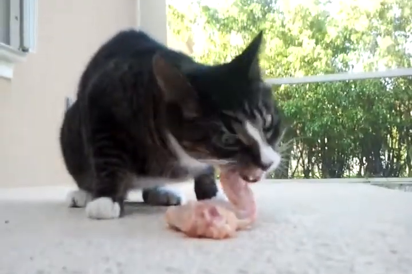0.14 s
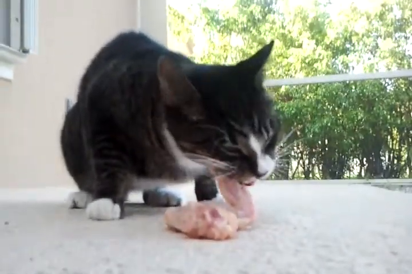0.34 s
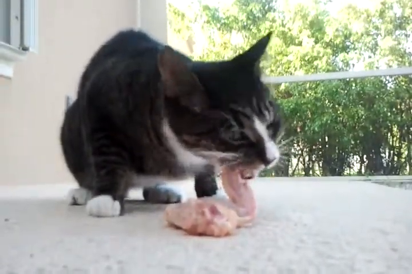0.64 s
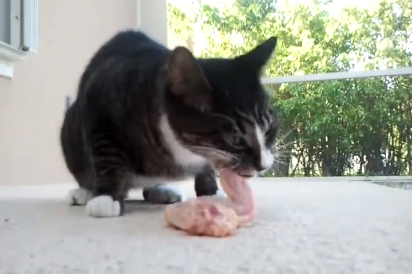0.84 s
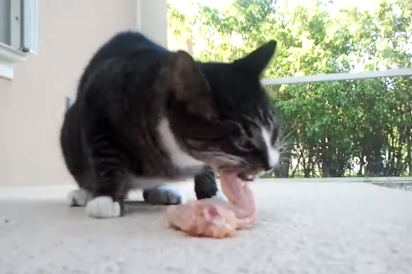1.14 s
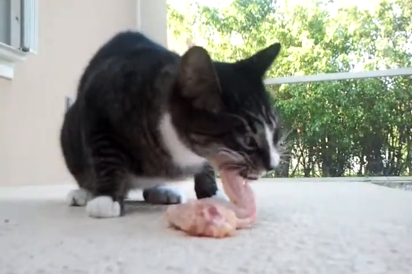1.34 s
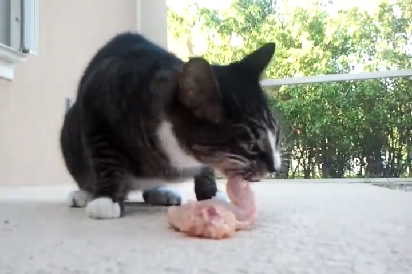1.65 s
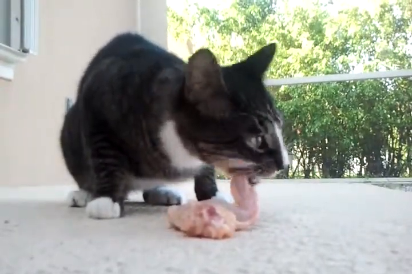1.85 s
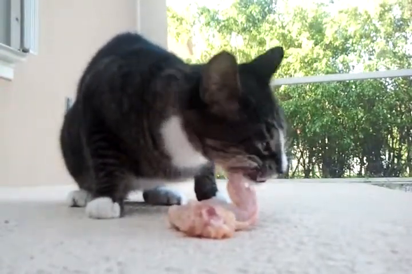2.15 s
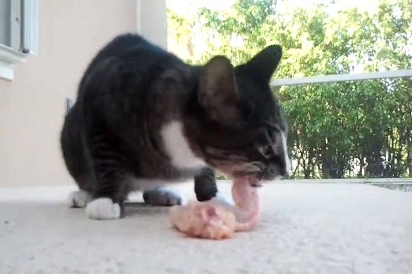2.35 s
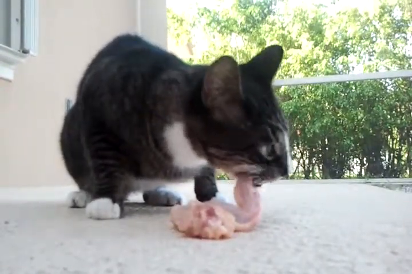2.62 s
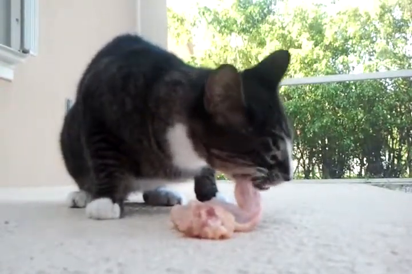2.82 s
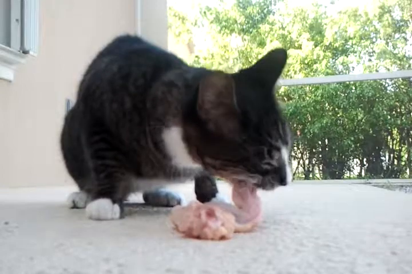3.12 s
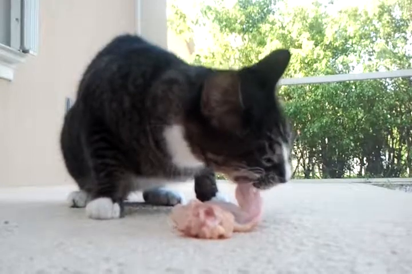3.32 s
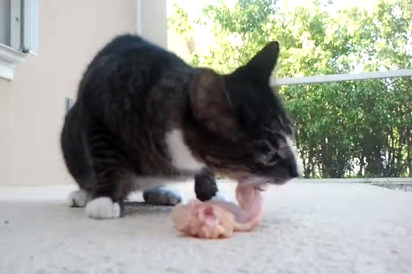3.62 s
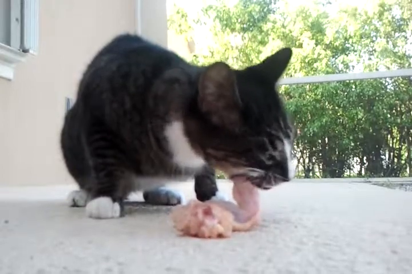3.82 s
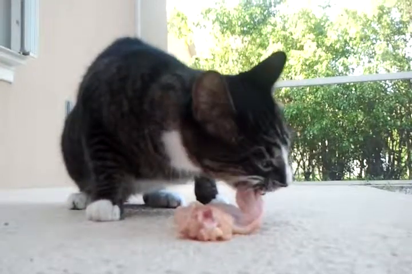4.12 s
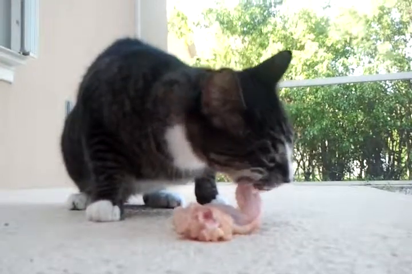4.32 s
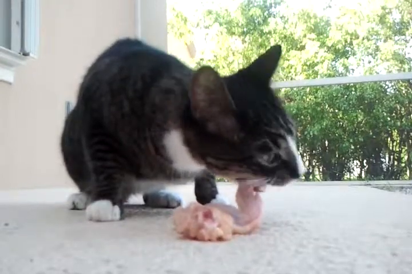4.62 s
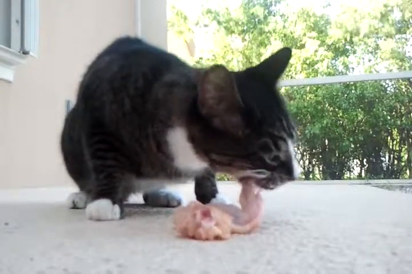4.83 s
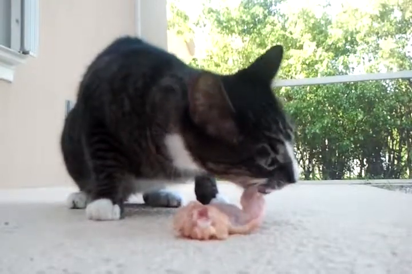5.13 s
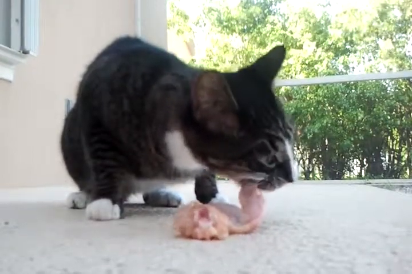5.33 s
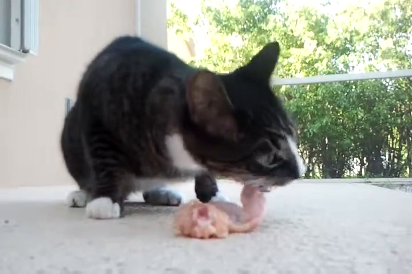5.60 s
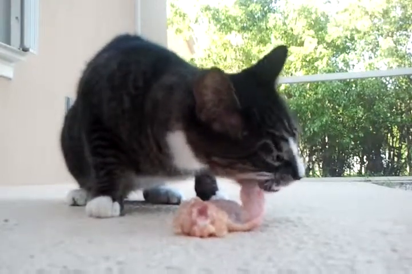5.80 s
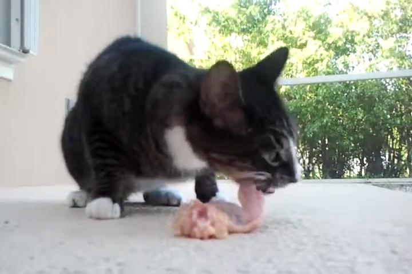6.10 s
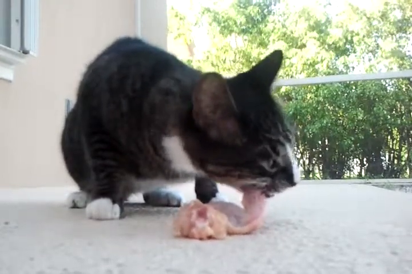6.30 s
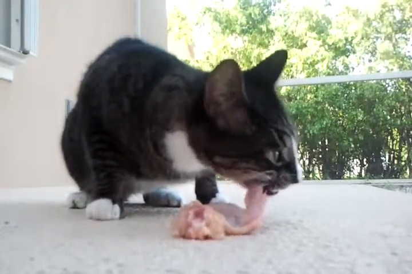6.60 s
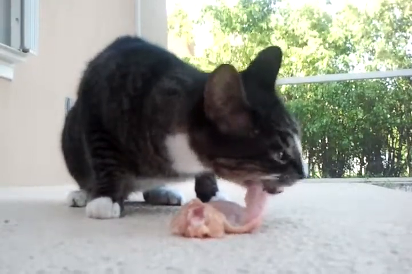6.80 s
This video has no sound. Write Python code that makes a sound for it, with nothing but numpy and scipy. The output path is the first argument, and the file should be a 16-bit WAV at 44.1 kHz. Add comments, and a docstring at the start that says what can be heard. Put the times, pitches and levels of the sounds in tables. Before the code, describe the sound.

A cat gnaws a raw chicken wing on a porch, close to a small camera microphone. After a moment of faint outdoor hiss, bone and gristle crack in irregular clusters of short, bright snaps, mixed with tooth grinding and fine crackle. Wet smacks come more often toward the end, where the loudest cracks land with slight dull thumps. Far traffic, a faint hum and a distant engine lie underneath.

```python
"""A cat gnaws a raw chicken wing on a porch floor, close to a small camera microphone.
Bone and gristle crack in short ringing snaps, teeth grind in runs of slips, fine splinters crackle.
Wet flesh smacks as cavities pop open. Short dull thumps sound, mostly under the loudest cracks.
Far traffic, outdoor hiss, mains hum and a passing engine lie underneath.
The microphone cuts the treble; the loudest peaks overload it."""
import sys
import numpy as np
from scipy import signal
from scipy.io import wavfile
from scipy.ndimage import uniform_filter1d

SR = 44100
rng = np.random.default_rng(int(sys.argv[2]) if len(sys.argv) > 2 else 0)


def put_to_file(sound):
    """Save the sound as 16-bit audio at rate SR, in the file named by the first command-line argument."""
    columns = np.atleast_2d(sound).T  # one column per channel
    safe = np.clip(columns, -1, 1)
    whole_steps = np.round(safe * 32767)
    wavfile.write(sys.argv[1], SR, whole_steps.astype(np.int16))


N = 306495

# outdoor noise layers: time_s, rumble_db, traffic_db, rustle_db, hiss_db
OUTDOOR_LEVELS = [(0.0, -52, -52, -49, -45.5), (0.23, -55.5, -53, -51, -47.5),
                  (1.55, -55.5, -50, -49, -46.5), (2.5, -50.5, -46.5, -50.5, -46.5),
                  (3.02, -53.5, -48, -49.5, -46.5), (3.6, -51, -49, -50, -44), (5.05, -53, -51, -50, -44.5),
                  (6.95, -49, -49, -50.5, -44)]
# spectral shape within those layers: frequency_hz, relative_db
OUTDOOR_SPECTRUM = [(30, -14), (146, 6), (650, -3), (830, 2.5), (1140, -1.5), (1340, 5), (2400, -1.5),
                    (3300, -0.5), (4100, 5.5), (4500, 3), (5100, 4.5), (6700, -8.5), (7400, -10),
                    (8600, -24)]
# far engine: time_s, rms_db
ENGINE_LEVELS = [(1.8, -79), (2.5, -63.5), (4.1, -63.5), (5.0, -72.5), (6.9, -77)]
# short dull thumps: time_s, peak_db, length_s
LOW_THUMPS = [(1.485, -31.5, 0.0013), (6.147, -26.5, 0.0011), (6.28, -26, .0006)]
# flesh and tongue smacks: time_s, peak_db, cavity_hz
FLESH_SMACKS = [(0.7347, -22, 2800), (2.0505, -31, 1280), (3.4972, -25, 2010), (3.51, -17, 2100),
                (4.667, -26, 2440), (5.015, -31, 2160), (5.032, -30, 2230), (5.3514, -28, 2220),
                (5.4764, -23.5, 1860), (5.493, -27, 1800), (5.6126, -25.5, 1960), (5.987, -21.5, 1880),
                (6.063, -24.5, 1880), (6.2808, -4.5, 3120), (6.5833, -21.5, 2700), (6.5839, -25.5, 1210),
                (6.589, -19, 1640), (6.709, -22, 1290), (6.7902, -30, 1530)]
# resonances near the microphone: centre_hz, width_hz, gain_db
NEAR_RESONANCES = [(4088, 120, 0), (5230, 160, -6), (6830, 1400, -10.5)]
# teeth slipping on bone (the first row draws out the ring of the first crack): start_s, length_s, slip_db,
# pitch_hz, width_hz, hollow_relative_db
TOOTH_GRINDS = [(0.733, 0.0035, -13, 4520, 296, -21.5), (.7775, 0.0099, -19, 4400, 445, -25),
                (1.423, .08, -43.5, 4110, 400, -28), (2.03, .03, -33, 4750, 750, -31),
                (2.449, .051, -27.5, 3860, 170, -28), (2.671, 0.0057, -22.5, 4270, 500, -18),
                (2.851, 0.0094, -31, 4570, 900, -12), (2.927, .022, -36, 5280, 700, -30),
                (3.247, .022, -20, 4660, 505, -14), (3.484, 0.015, -19.5, 4365, 480, -21),
                (3.813, 0.011, -21, 5400, 670, -34), (4.175, 0.048, -28.5, 4240, 406, -23),
                (4.61, .02, -30.5, 5150, 543, -30), (4.843, 0.024, -33.5, 5300, 700, -30),
                (5.201, .042, -20.5, 4480, 750, -9.5), (6.071, 0.028, -37, 4930, 800, -2.5),
                (6.175, 0.0092, -27.5, 4970, 800, -23), (6.27, .005, -29, 4370, 600, -25),
                (6.2775, 0.0068, -17.5, 4670, 800, -9), (6.534, .01, -30, 4620, 600, -24),
                (6.577, 0.019, -22.5, 4980, 700, -10), (6.807, 0.023, -29, 4930, 520, -16),
                (6.849, .007, -29.5, 5300, 630, -29)]
# bone and gristle cracks: time_s, peak_db, pitch_hz
BONE_CRACKS = [(.7315, -24, 4650), (.7351, -8, 4520), (.7401, -8, 4620), (.7844, -4, 4280),
               (.7929, -19, 4310), (.8837, -14, 4510), (.8913, -11, 5250), (1.0924, -18, 4420),
               (1.1562, -15, 5060), (1.1785, -7, 4640), (1.2559, -11, 4580), (1.2906, -19, 4160),
               (1.5107, -23, 4240), (1.5584, -18, 4060), (1.5915, -4, 3900), (1.5984, -10, 3920),
               (1.6072, -4, 4110), (1.635, -7.5, 4170), (1.6443, -19, 4590), (1.6564, -23, 4790),
               (1.7058, -22, 4780), (1.745, -27, 4300), (1.788, -27, 4200), (1.8097, -19, 4190),
               (1.8508, -21, 5160), (2.0155, -25, 4450), (2.0342, -20, 4690), (2.0398, -18, 5230),
               (2.0505, -13, 5030), (2.0618, -19, 4210), (2.081, -23, 5110), (2.1562, -19, 5470),
               (2.4218, -20, 4190), (2.4609, -16, 4000), (2.4793, -14, 3870), (2.4908, -15, 3860),
               (2.5186, -23, 4800), (2.5317, -19, 4730), (2.6513, -18, 4220), (2.6576, -10, 4540),
               (2.6803, -12.5, 5170), (2.7066, -23, 4440), (3.026, -7, 4390), (3.2382, -24, 4290),
               (3.2516, -9, 4430), (3.2643, -13, 4330), (3.2762, -20, 5400), (3.3016, -25, 4830),
               (3.459, -28, 4100), (3.4974, -11, 4470), (3.5099, -23, 3800), (3.5897, -24, 5350),
               (3.6657, -17, 5260), (3.692, -20, 4990), (3.705, -13, 5400), (4.169, -5, 4650),
               (4.1905, -11, 4270), (4.1964, -14.5, 4190), (4.2185, -16, 4230), (4.2861, -19, 5180),
               (4.3657, -9, 4280), (4.3977, -24, 4630), (4.4738, -24, 3650), (4.5306, -24, 4610),
               (4.6233, -20, 5240), (4.6473, -18, 5010), (4.6675, -7, 4880), (4.743, -16, 5370),
               (5.0144, -19, 5000), (5.2191, -9, 4400), (5.2364, -12.5, 4280), (5.2949, -22, 5400),
               (5.3407, -16, 5430), (5.3444, -15, 5290), (5.3523, -15, 4570), (5.4761, -4, 4540),
               (5.6116, -24, 4020), (5.6454, -22, 4710), (5.7117, -26, 4580), (5.7696, -23, 5230),
               (5.8722, -24, 4440), (5.9088, -23, 4430), (5.9844, -4, 4360), (5.9918, -12, 4410),
               (6.1392, -9, 4580), (6.1471, -1.7, 5320), (6.2228, -13, 4560), (6.2792, -1.3, 4370),
               (6.2949, -23, 4210), (6.3382, -16.5, 4260), (6.3547, -22, 4850), (6.5152, -24.5, 4390),
               (6.5631, -2.85, 4600), (6.5837, -12, 4780), (6.5892, -10, 4440), (6.7088, -19, 3950),
               (6.7912, -16, 5060), (6.8108, -11, 5030)]


def from_db(db):
    """Decibels to gain."""
    return 10 ** (np.asarray(db) / 20)


def unit_rms(x):
    """Scale to rms 1."""
    return x / np.sqrt(np.mean(x ** 2) + 1e-20)


def curves(rows):
    """Table columns interpolated to one value per sample."""
    time_s, *columns = np.transpose(rows)
    return [np.interp(np.arange(N) / SR, time_s, column) for column in columns]


def drift(rate_hz):
    """Slow random wander, rms 1."""
    pole = np.exp(-80 * np.pi * rate_hz / SR)
    slow = signal.lfilter([1], [1, -2 * pole, pole * pole], rng.standard_normal(N // 40 + 2002))[2000:]
    return np.interp(np.arange(N) / 40, np.arange(len(slow)), unit_rms(slow))


def place(out, time_s, sound, peak_db):
    """Add a sound with its peak at time_s."""
    start = round(time_s * SR) - np.abs(sound).argmax()
    out[start:start + len(sound)] += (from_db(peak_db) * sound / np.abs(sound).max())[:N - start]


def resonance(x, hz, width_hz):
    """Two-pole band-pass, peak gain 1."""
    r = np.exp(-np.pi * width_hz / SR)
    feedback = [1, -2 * r * np.cos(2 * np.pi * hz / SR), r * r]
    return signal.lfilter(np.array([1, 0, -1]) * (1 - r * r) / 2, feedback, x + 1e-18)


def outdoors(wander_db=1.5, splits_hz=(320, 1270, 2540)):
    """Wavering noise bands, grouped into rumble, far traffic, rustle and hiss."""
    edges_hz = 2540 * 2 ** np.r_[np.arange(-20, 0) / 3, np.arange(14) / 7]
    shape_hz, shape_db = np.transpose(OUTDOOR_SPECTRUM)
    white = rng.standard_normal((2, N))  # unrelated noise for adjacent bands
    layers = np.zeros((4, N))
    for k, (low, high) in enumerate(zip(edges_hz, edges_hz[1:])):
        hz = np.sqrt(low * high)
        band = signal.sosfilt(signal.butter(2, [low, high], "band", fs=SR, output="sos"), white[k % 2])
        band_db = np.interp(np.log(hz), np.log(shape_hz), shape_db) + wander_db * drift(0.84)
        layers[np.searchsorted(splits_hz, hz)] += from_db(band_db) * band
    return sum(from_db(db) * unit_rms(layer) for db, layer in zip(curves(OUTDOOR_LEVELS), layers))


def mains_hum(pitch_hz=240, rms_db=-63):
    """A tone wavering in level."""
    return np.sqrt(2) * from_db(rms_db + drift(5.6)) * np.sin(2 * np.pi * pitch_hz * np.arange(N) / SR)


def far_engine(pitch_hz=72, wander_hz=1.2):
    """A passing drone swells and fades, wavering in pitch."""
    phase = 2 * np.pi * np.cumsum(pitch_hz + wander_hz * drift(1.2)) / SR
    return np.sqrt(2) * from_db(curves(ENGINE_LEVELS)[0]) * np.sin(phase)


def low_thumps():
    """Short dull thumps, one smooth pulse each, mostly under the loudest cracks."""
    out = np.zeros(N)
    for time_s, peak_db, length_s in LOW_THUMPS:
        place(out, time_s, np.hanning(int(length_s * SR)), peak_db)
    return out


def flesh_smacks(decay_cycles=9.6, rise_s=.0002):
    """A wet cavity pops open: a few cycles at its pitch plus a weaker upper resonance."""
    out, t = np.zeros(N), np.arange(600) / SR
    for time_s, peak_db, hz in FLESH_SMACKS:
        pop = np.sin(2 * np.pi * hz * t) + 0.44 * np.sin(2 * np.pi * 1.8 * hz * t)
        envelope = from_db(-60 * t * hz / decay_cycles) * (1 - np.exp(-(t / rise_s) ** 2))
        place(out, time_s, pop * envelope, peak_db)
    return out


def snap(t, hz, width_hz):
    """A fracture swells and dies within cycles; wider spectrum, shorter snap."""
    age = np.maximum(np.pi * width_hz * t, 0)
    return (age * np.exp(1 - age)) ** 2 * np.sin(2 * np.pi * hz * t)


def radiate(x, low_cut_hz=3540):
    """Small pieces radiate little bass; nearby resonances add a longer ring."""
    x = signal.sosfilt(signal.butter(4, low_cut_hz, "high", fs=SR, output="sos"), x)
    return x + sum(from_db(db) * resonance(x, hz, width_hz) for hz, width_hz, db in NEAR_RESONANCES)


def splinters(bones, start_s=.7, idle_per_s=70, base_db=-41.5, spread_db=5.5, jaw_window_s=.049):
    """Tiny random fractures at six pitches, denser while the jaw works."""
    activity = uniform_filter1d(1.0 * (np.abs(bones) > .03), int(jaw_window_s * SR))
    rate_per_s = idle_per_s * (1 + 5.2 * np.sqrt(np.abs(activity) / activity.max()))
    sizes = from_db(base_db + spread_db * np.minimum(rng.exponential(1, N), 3.3))
    impulses = sizes * (rng.random(N) < rate_per_s / SR)
    impulses[:int(start_s * SR)] = 0
    pitch_index, t = rng.integers(0, 6, N), np.arange(200) / SR
    crackle = sum(signal.oaconvolve(impulses * (pitch_index == k), snap(t, hz, width_hz=1100))[:N]
                  for k, hz in enumerate(np.geomspace(3600, 5500, 6)))
    return radiate(crackle)


def tooth_grinds(gap_s=.002, max_slips=48, spread_db=3.0, detune=.65, hollow_hz=3000, hollow_width_hz=360):
    """Quick, uneven runs of slips near one pitch, over the bone's hollow undertone."""
    slips, hollow, t = np.zeros(N), np.zeros(N), np.arange(500) / SR
    for start_s, length_s, slip_db, hz, width_hz, hollow_db in TOOTH_GRINDS:
        gap, size, pitch, hollow_pitch = rng.standard_normal((4, max_slips))
        lags_s = np.cumsum(gap_s * np.exp(.45 * gap))
        lags_s -= lags_s[0]
        for k, time_s in enumerate(start_s + lags_s[lags_s < length_s]):
            level_db = slip_db + spread_db * size[k]
            slip = snap(t, hz + detune * pitch[k] * width_hz, 1.4 * width_hz)
            undertone = snap(t, hollow_hz + detune * hollow_pitch[k] * hollow_width_hz, hollow_width_hz)
            place(slips, time_s, slip, level_db)
            place(hollow, time_s, undertone, level_db + hollow_db)
    return radiate(slips) + hollow


def bone_cracks(crumb_count=16, crumb_db=-16, mean_lag_s=.004, fade_db_per_s=780):
    """Each crack is a snap ringing at its pitch, amid weaker snaps as the piece crumbles."""
    out, t = np.zeros(N), np.arange(1000) / SR
    lags_s = -mean_lag_s * np.log(1 - rng.random((len(BONE_CRACKS), crumb_count)))
    scatter = rng.standard_normal((len(BONE_CRACKS), 2, crumb_count))
    for (time_s, peak_db, hz), lag_s, (size, pitch) in zip(BONE_CRACKS, lags_s, scatter):
        base_width_hz = 360 + .15 * (hz - 4500) + 37 * time_s  # higher and later cracks are sharper
        fracture = snap(t - .0017, hz, 2.1 * base_width_hz)
        ring = .266 * fracture.std() * unit_rms(resonance(fracture, hz, width_hz=250))
        crumb_gain = from_db(crumb_db + 2.3 * size - fade_db_per_s * lag_s)
        crumb_hz = hz + .83 * base_width_hz * (pitch + .5)
        crumbs = crumb_gain * snap(t[:, None] - lag_s, crumb_hz, 2.3 * base_width_hz)
        place(out, time_s, radiate(fracture + ring + crumbs.sum(1)), peak_db)
    return out


def scene():
    """Gnawing over the outdoor background, mono."""
    bones = bone_cracks() + tooth_grinds()
    gnawing = bones + splinters(bones) + flesh_smacks()
    return (gnawing + low_thumps() + outdoors() + mains_hum() + far_engine())[None]


def record(dry, mic_stop_hz=9930, ceiling=.725, output_stop_hz=16700):
    """Camera microphone: steep treble cut, hard overload, final low-pass."""
    heard = signal.sosfilt(signal.cheby2(10, 60, mic_stop_hz, fs=SR, output="sos"), dry)
    overloaded = np.clip(heard, -ceiling, ceiling)
    return signal.sosfilt(signal.cheby2(12, 70, output_stop_hz, fs=SR, output="sos"), overloaded)


dry = scene()
out = record(dry)
put_to_file(out)
```